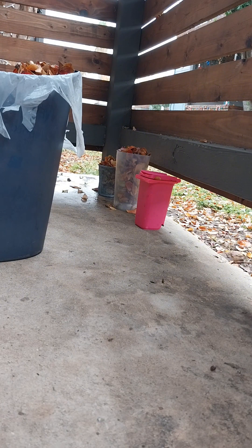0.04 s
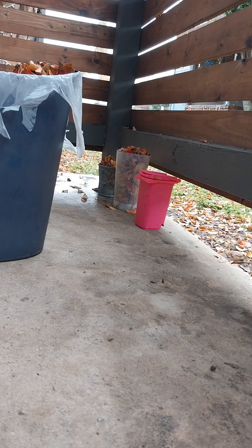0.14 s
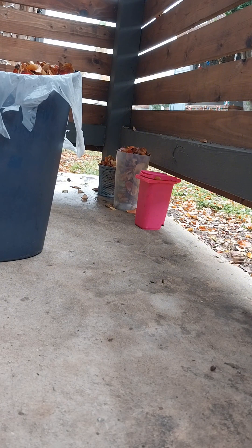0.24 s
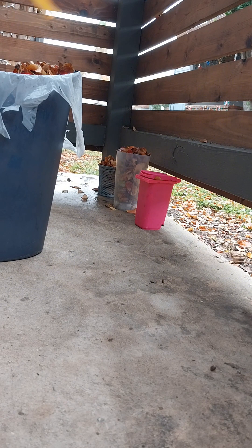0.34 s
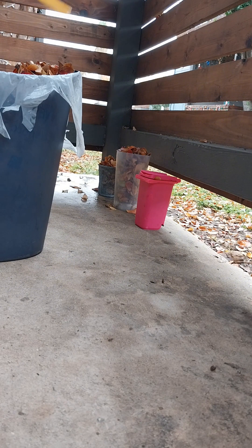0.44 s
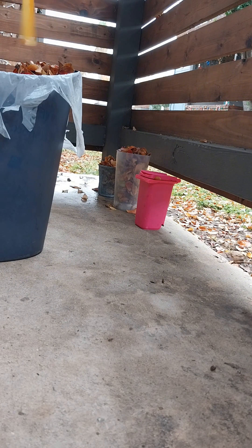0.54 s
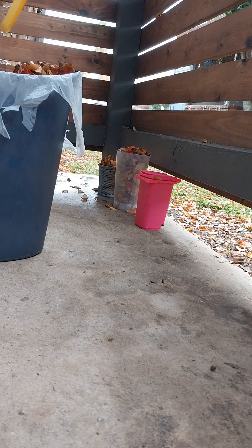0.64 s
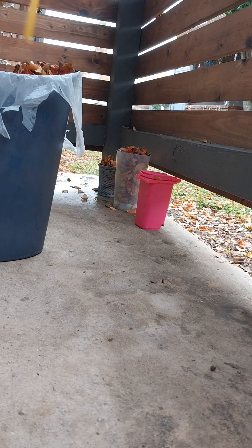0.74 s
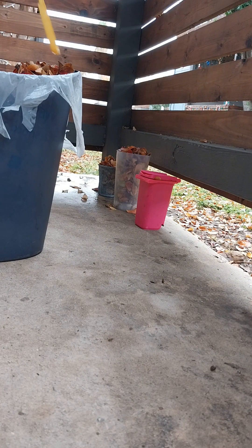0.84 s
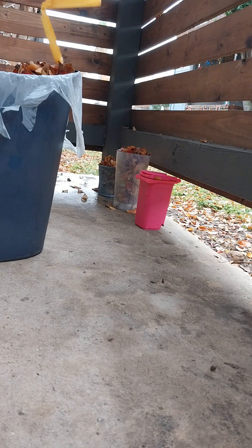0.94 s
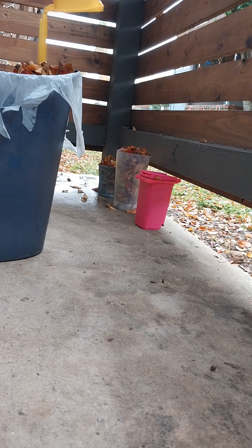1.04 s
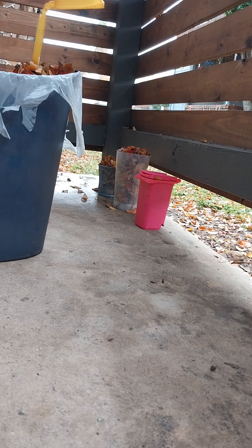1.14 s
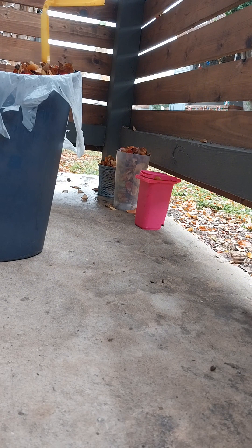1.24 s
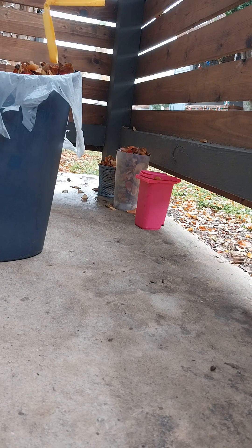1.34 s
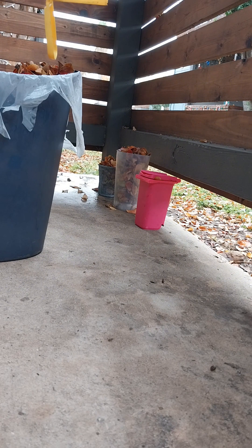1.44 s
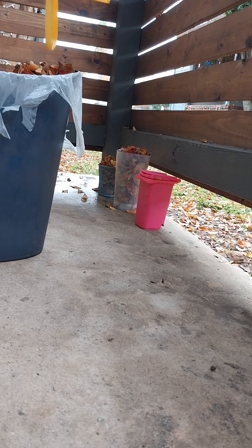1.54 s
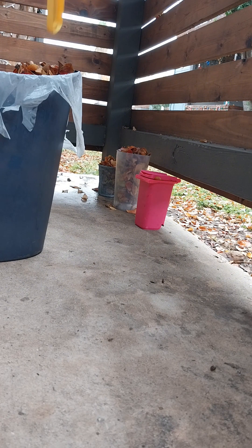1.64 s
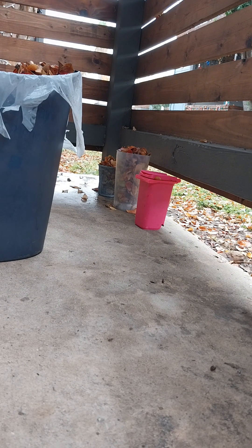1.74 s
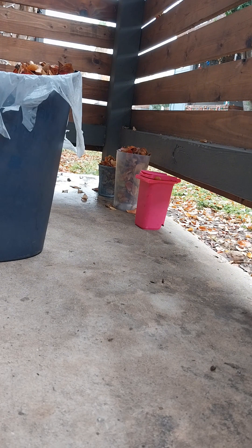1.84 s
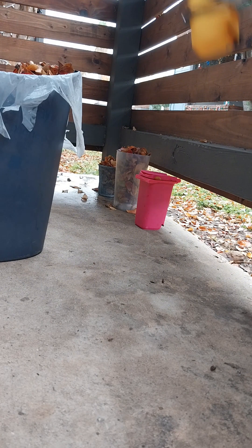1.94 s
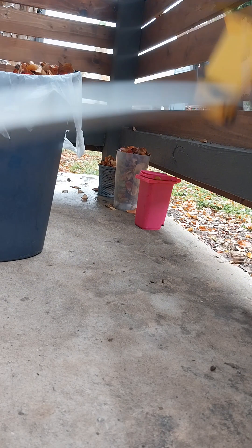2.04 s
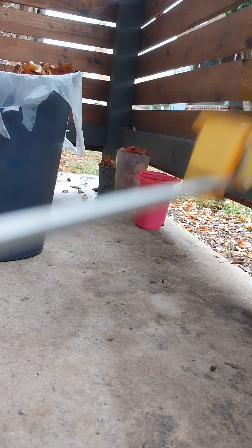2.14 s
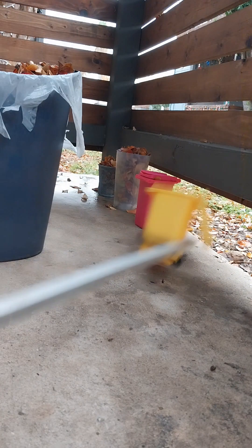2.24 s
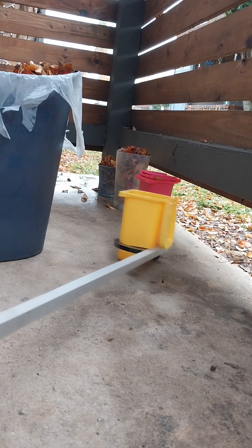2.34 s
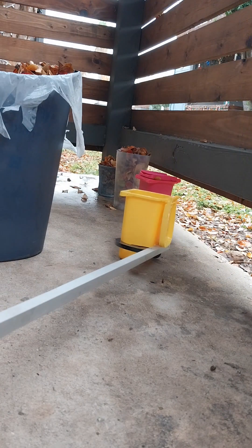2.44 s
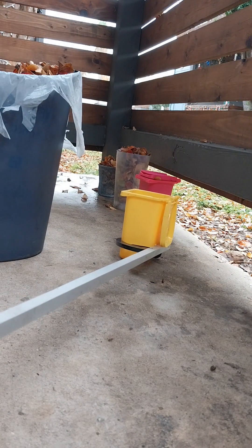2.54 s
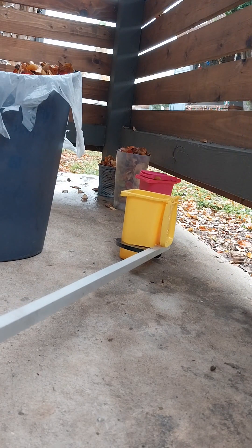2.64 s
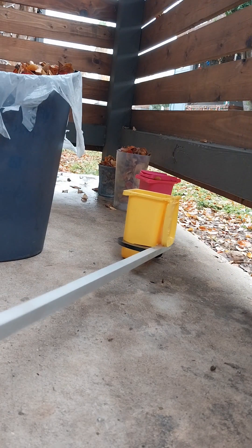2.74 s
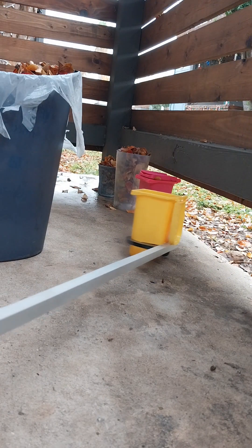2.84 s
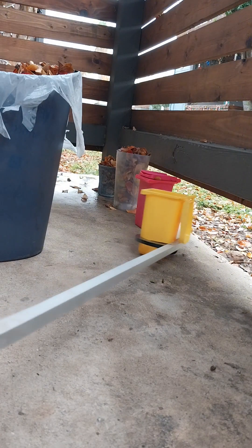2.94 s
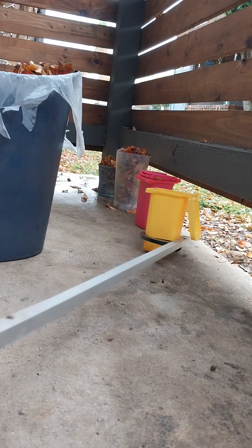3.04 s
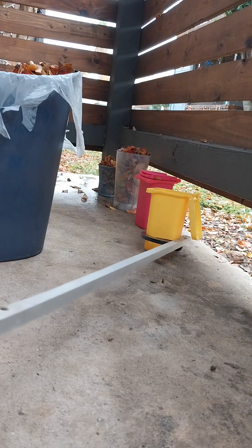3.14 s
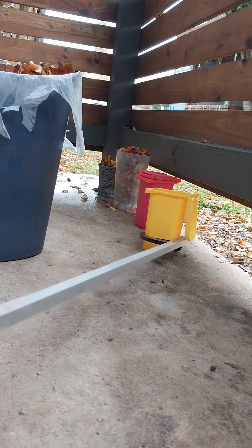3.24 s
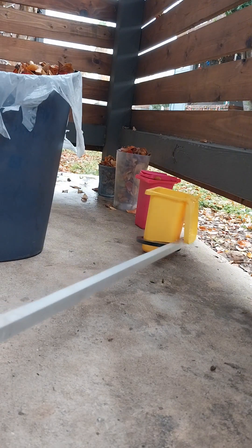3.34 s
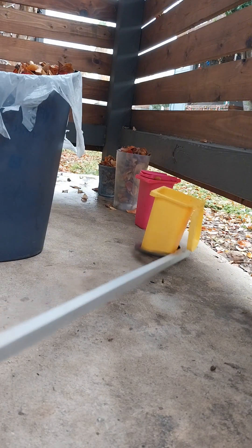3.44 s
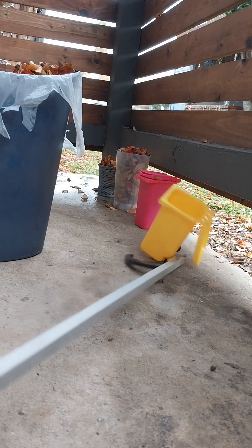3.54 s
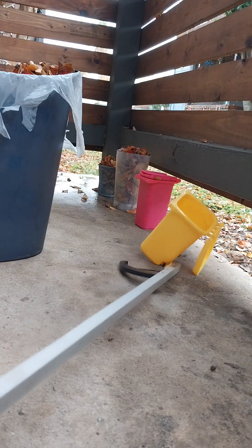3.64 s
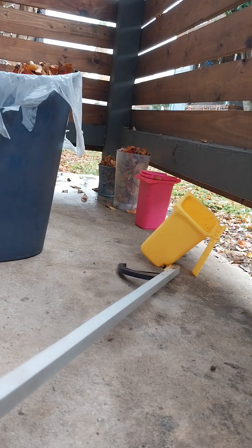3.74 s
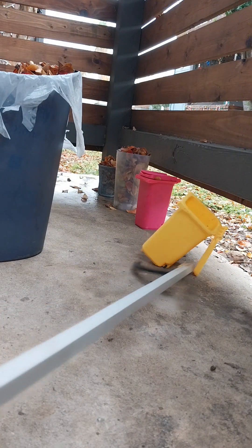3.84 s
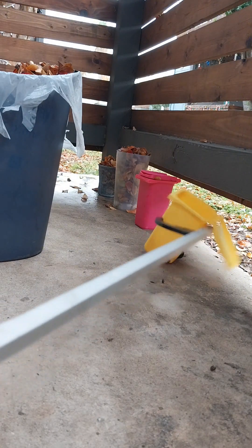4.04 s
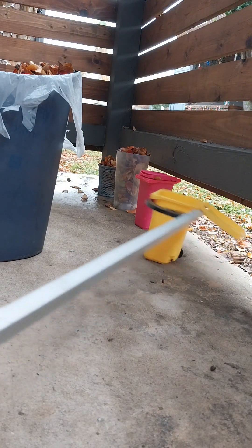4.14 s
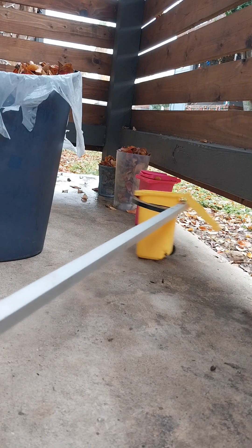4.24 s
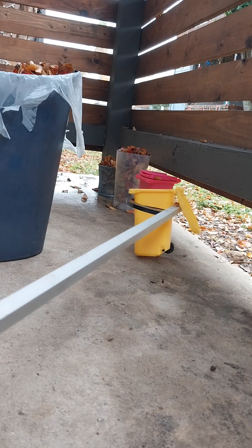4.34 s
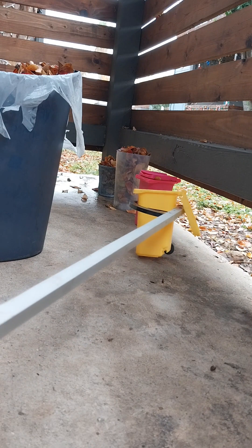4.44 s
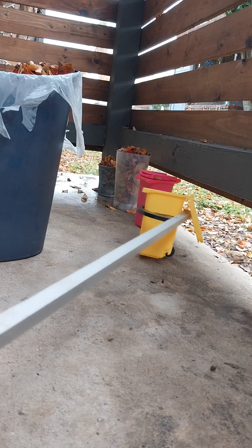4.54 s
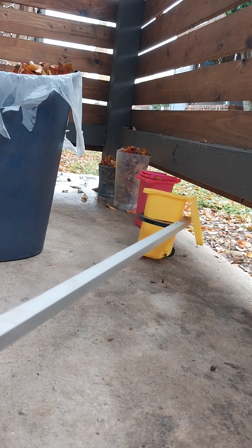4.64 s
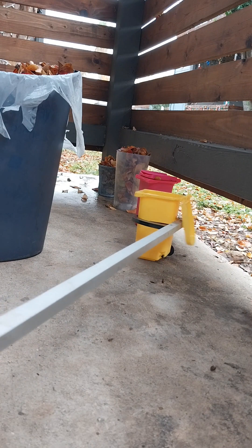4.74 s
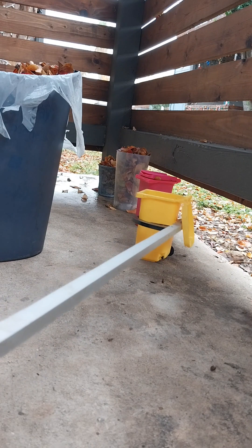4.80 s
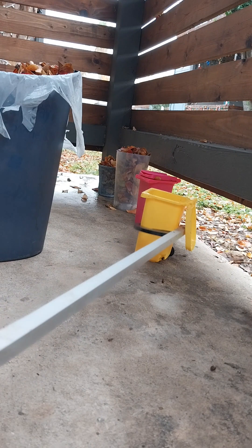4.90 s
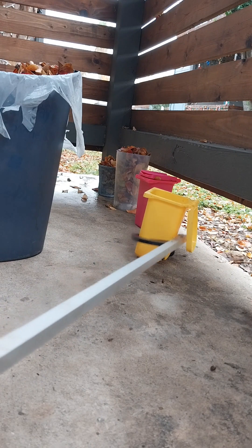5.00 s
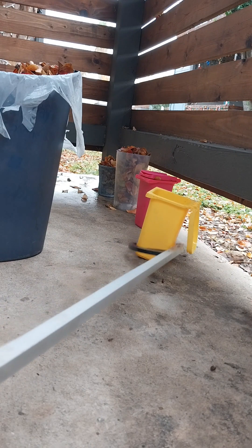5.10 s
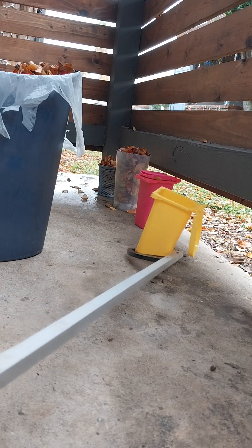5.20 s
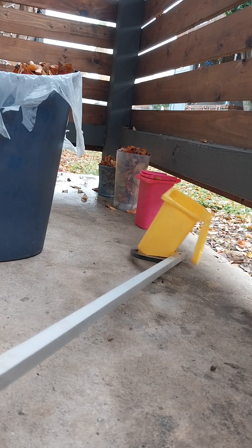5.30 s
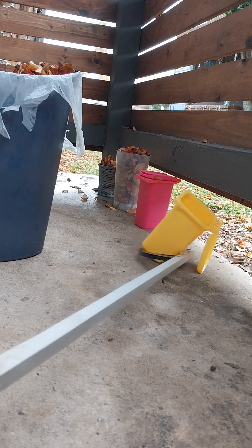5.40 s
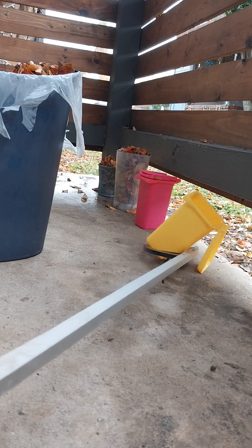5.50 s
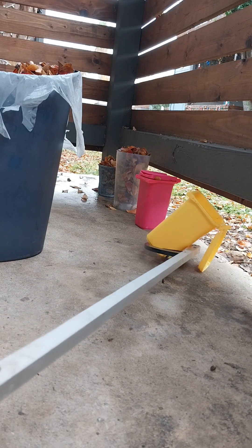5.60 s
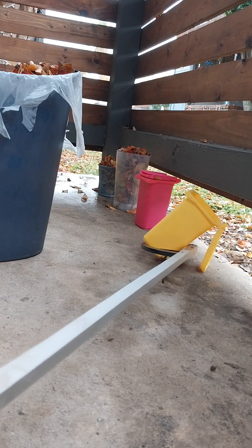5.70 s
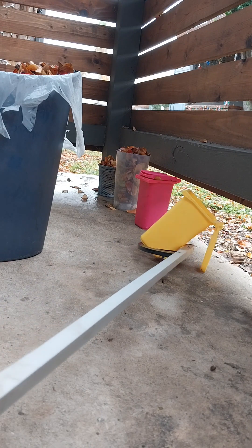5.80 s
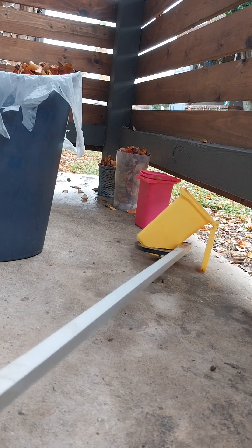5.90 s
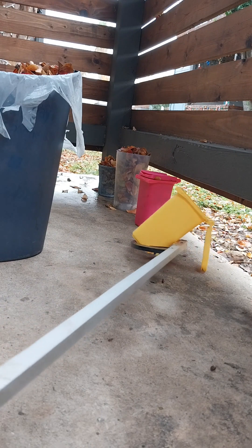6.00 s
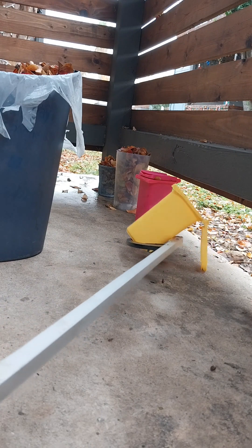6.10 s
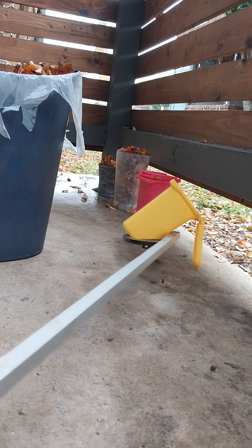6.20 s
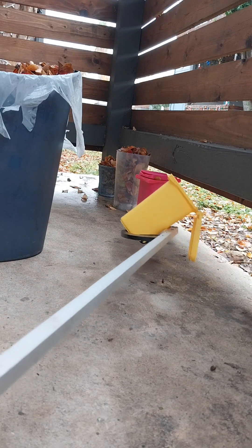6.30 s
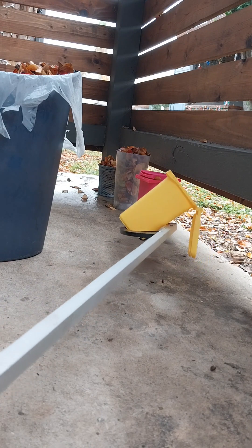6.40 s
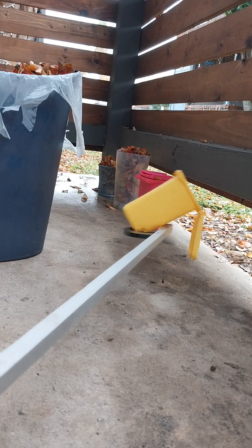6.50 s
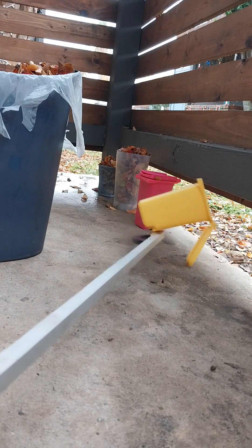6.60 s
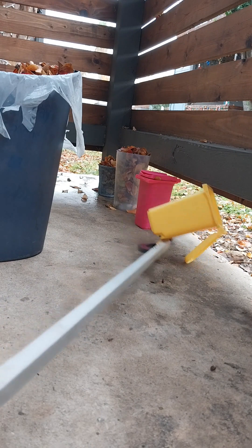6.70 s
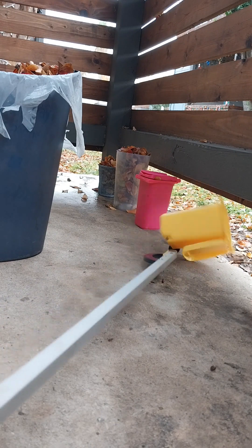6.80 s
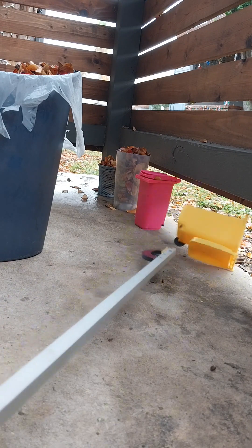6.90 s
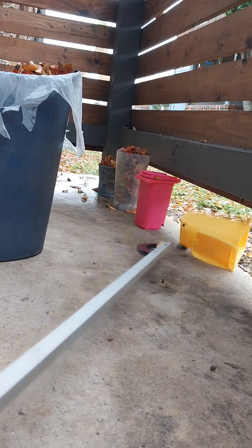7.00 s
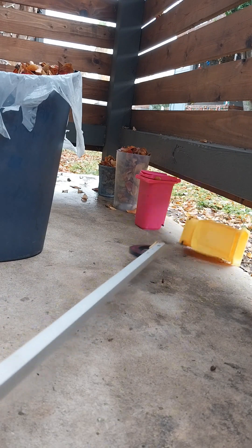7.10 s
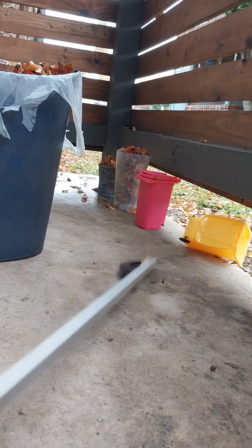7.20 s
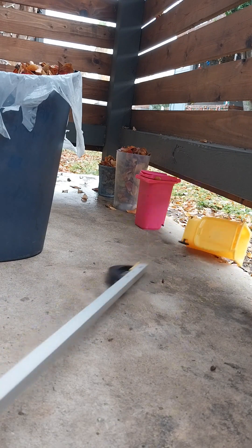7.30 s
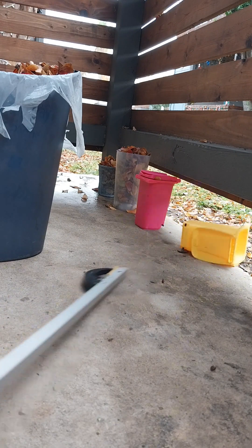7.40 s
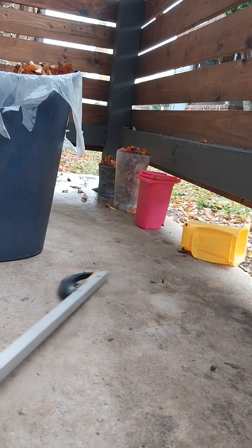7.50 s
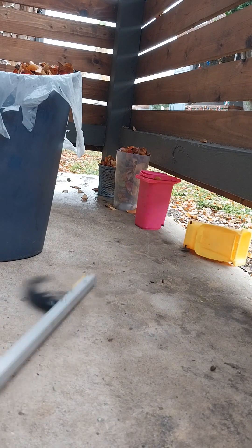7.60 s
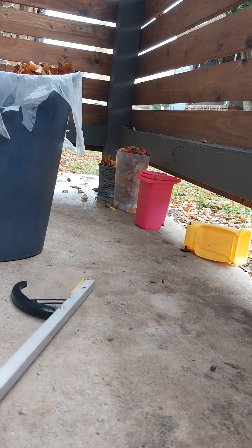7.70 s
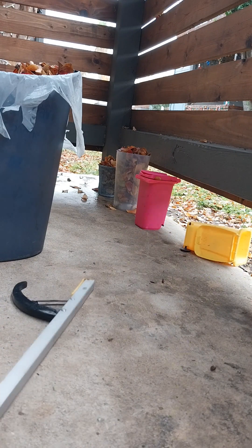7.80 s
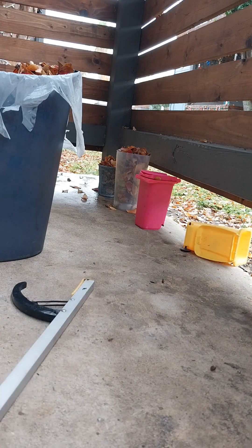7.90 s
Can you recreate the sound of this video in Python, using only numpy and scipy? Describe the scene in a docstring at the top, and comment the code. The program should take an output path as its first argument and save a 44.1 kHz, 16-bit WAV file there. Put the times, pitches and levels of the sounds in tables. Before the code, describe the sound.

A small hollow plastic bin is knocked, shoved and tumbled on concrete by a toy truck arm, metal rod scraping and clanking over distant machinery hum.

```python
"""Machinery hums and rumbles in the distance as wavering low tones and noise; a far bird gives gliding chirps.
A toy garbage-truck arm rustles, then sets a small hollow plastic bin on a concrete porch, shoves it,
tips it and lets it tumble: each knock is a crack, ringing walls and a booming cavity.
The claw rubs the bin, and the arm's metal rod scrapes and clatters, at last by itself:
friction is coloured random slips, clanks are struck modes. Plank walls answer with a short noise tail."""
import sys
import numpy as np
from scipy import signal
from scipy.fft import rfft, irfft, next_fast_len
from scipy.io import wavfile
from scipy.ndimage import map_coordinates

SR = 44100
rng = np.random.default_rng(int(sys.argv[2]) if len(sys.argv) > 2 else 0)


def dump(signal):
    """Clip the signal to [-1, 1] and save it as 16-bit WAV at the path in sys.argv[1]."""
    limited = np.clip(np.atleast_2d(signal).T, -1, 1)
    pcm = np.round(limited * 32767).astype(np.int16)
    wavfile.write(sys.argv[1], SR, pcm)


N = 350595
TIME_S = np.arange(N) / SR
AGE_S = np.arange(SR // 2) / SR  # time since a blow


def amp(db):
    """Decibels to gain."""
    return 10 ** (np.asarray(db) / 20)


def unit(x):
    """Scale to rms 1."""
    return x / np.sqrt(np.mean(x ** 2) + 1e-20)


def blow(x):
    """Scale a burst to the energy of 10 ms at rms 1."""
    return x / np.sqrt(np.sum(x ** 2) / (SR * .01) + 1e-20)


def along(points, hz):
    """Read (Hz, value) points on a log frequency axis."""
    point_hz, value = np.transpose(points)
    return np.interp(np.log(hz + 1), np.log(point_hz + 1), value)


def wobble(rate):
    """A smooth random curve, rate knots a second."""
    knots = rng.standard_normal(int(N * rate / SR) + 4)
    return map_coordinates(knots, [np.arange(N) * rate / SR])


def colour(x, points):
    """Causal minimum-phase filter with the gain of (Hz, dB) points."""
    n = x.shape[-1]
    m = 2 * next_fast_len(n // 2 + 2048)
    gain = amp(along(points, np.fft.rfftfreq(m, 1 / SR)))
    # folding the cepstrum forward in time makes the filter causal
    cepstrum = irfft(np.log(gain), m)
    cepstrum[1:m // 2] *= 2
    cepstrum[m // 2 + 1:] = 0
    return irfft(rfft(x, m) * np.exp(rfft(cepstrum)), m)[..., :n]


def softened(points, db, softening=0.8):
    """A gentle contact lasts longer, so its snap loses the top octave."""
    slope = softening * min(db + 45.5, 0)
    return [(hz, level + slope * np.log2(max(hz / 7500, 1))) for hz, level in points]


def tilted(rows, slope):
    """Tilt rows that begin with (Hz, dB) by slope dB an octave around 1 kHz."""
    return [(hz, db + slope * np.log2(hz / 1000), *rest) for hz, db, *rest in rows]


def fade(t60):
    """Exponential decay after a blow, 60 dB in t60 seconds."""
    return np.exp(-np.log(1000) * AGE_S / t60)


def burst(points, t60, apart, rise=0.00053):
    """A short coloured crack; apart (0-1) is the share of noise that differs between the channels."""
    common, *own = rng.standard_normal((3, len(AGE_S)))
    share = np.clip(apart, 0, 1)
    noise = np.sqrt(1 - share) * common + np.sqrt(share) * np.array(own)
    envelope = fade(t60) * (1 - np.exp(-AGE_S / rise))
    crack = colour((noise * envelope)[:, AGE_S < .08], points)
    return np.array([blow(np.pad(side, (0, len(AGE_S) - len(side)))) for side in crack])


def ring(modes, detune):
    """Modes struck at a new spot: new strengths and signs, pitches shifted by the share detune."""
    luck = rng.standard_normal((len(modes), 3))
    total = 0
    for (hz, db, t60), (strength, shift, sign) in zip(modes, luck):
        tone = np.sin(2 * np.pi * hz * (1 + detune * shift) * AGE_S)
        total = total + np.sign(sign) * amp(db + 4.4 * strength) * fade(t60) * tone
    return blow(total)


def add(track, s, x):
    """Mix x into the track at time s."""
    i = round(s * SR)
    track[:, i:i + x.shape[-1]] += x[:, :N - i]


def grains(rate, spread_db):
    """Tiny random slips, rate a second on average, of very unequal sizes."""
    hit = rng.random(N) < rate / SR
    size_db = spread_db * np.minimum(rng.exponential(size=N), 3)
    return hit * rng.standard_normal(N) * amp(size_db)


def strokes(rows, depth_db=18.5):
    """Friction gains: each swells by depth_db over its rise, holds, then loses depth_db every fall time."""
    total = 0
    for start, rise, hold, fall, *levels_db in rows:
        building = np.clip(1 - (TIME_S - start) / rise, 0, 1)
        dying = np.maximum(TIME_S - start - rise - hold, 0) / fall
        shape = (TIME_S >= start) * amp(-depth_db * (building + dying))
        total = total + np.outer(amp(levels_db), shape)  # one row for each level column
    return total


# decay of the porch's echo: pitch_hz, t60_s
PORCH_DECAY = [(200, 0.71), (530, 0.34), (1400, 0.31), (3700, 0.27), (10000, 0.26), (16000, 0.17)]


def porch(x, wet_db, right_db):
    """Direct sound plus a noise tail from the planks, wider in the treble; right_db lifts the right channel."""
    hz, t, z = signal.stft(rng.standard_normal((2, len(AGE_S))), SR, nperseg=256)
    z = z * np.exp(-np.log(1000) * t / along(PORCH_DECAY, hz)[:, None])
    z[1] *= along([(200, 0.047), (600, 0.57), (2000, 1)], hz)[:, None]  # width over frequency
    mid, side = signal.istft(z, SR, nperseg=256)[1]
    tail = np.array([mid + side, mid - side])
    tail *= 1 - np.exp(-np.arange(len(mid)) / SR / 0.00071)  # soft onset
    tail = tail / np.linalg.norm(mid)
    wet = signal.fftconvolve(np.atleast_2d(x), tail, axes=1)[:, :x.shape[-1]]
    return (x + amp(wet_db) * wet) * amp([[-right_db / 2], [right_db / 2]])


def wash(points, side_db):
    """Coloured stereo noise of rms 1; side_db sets its width."""
    mid, side = colour(rng.standard_normal((2, N)), points)
    return unit(np.array([mid + amp(side_db) * side, mid - amp(side_db) * side]))


# level of the background hum and rumble over time, before the mix trims: time_s, level_db
LOW_LEVEL = [(0.0, -37.5), (0.11, -36.5), (2.32, -37), (2.77, -42.5), (2.92, -37), (3.23, -40.5),
             (4.29, -35), (4.49, -39), (7.44, -35.5), (7.95, -37.5)]
# wavering low hum tones, relative levels: pitch_hz, level_db
HUM_TONES = [(73, -55), (112.5, -42.5), (162, -45.5), (212, -58.5), (353, -59), (410, -72.5)]
# colour of the machine rumble: pitch_hz, relative_level_db
RUMBLE_COLOUR = [(18, -49), (30, -22.5), (48, -8), (62, -4.5), (80, -1), (105, 4), (135, -5), (180, -1),
                 (230, -3), (300, -14.5), (390, -18), (600, -67.5)]
# colour of the outdoor air: pitch_hz, relative_level_db
AIR_COLOUR = [(240, -32.5), (400, -13), (432, -9), (545, -7), (979, -12), (1160, -21.5), (2400, -26.5),
              (3070, -29), (4580, -27.5), (4950, -29), (8900, -39), (13500, -38.5), (16000, -49)]


def background():
    """Distant machinery: wavering hum tones over a noise rumble, and faint outdoor air."""
    level = amp(np.interp(TIME_S, *np.transpose(LOW_LEVEL)))
    hum = 0
    for hz, db in HUM_TONES:
        gain = amp(db + 3.0 * wobble(3.05)) * np.sqrt(2)
        hum = hum + gain * np.sin(2 * np.pi * hz * TIME_S + 0.45 * wobble(5))
    rumble = amp(-1.25) * level * wash(RUMBLE_COLOUR, side_db=-19)
    low = rumble + amp(-5) * unit(level) * hum
    air = amp(-54.5 + 0.43 * wobble(2.14)) * wash(AIR_COLOUR, side_db=-1.5)
    return low * amp([[-.55], [.55]]) + air  # the lows lean slightly to the right


# bird chirps, levels before the mix trim: start_s, length_s, start_pitch_hz, end_pitch_hz, level_db
BIRD_CHIRPS = [(0.065, 0.054, 4590, 3820, -56), (0.108, 0.067, 2930, 2360, -59),
               (0.96, 0.079, 4270, 3440, -56), (1.025, .07, 2700, 2250, -65),
               (5.593, 0.064, 4220, 3900, -58), (5.635, 0.053, 2730, 2490, -58),
               (6.205, 0.075, 3360, 3420, -49), (6.475, 0.029, 3500, 3600, -45)]


def bird():
    """Far, wavering chirps: sines gliding between two pitches, mostly echo."""
    out = np.zeros((2, N))
    for s, length, start_hz, end_hz, db in BIRD_CHIRPS:
        progress = np.minimum(AGE_S / length, 1)
        glide_hz = start_hz + (end_hz - start_hz) * progress
        hz = glide_hz * (1 + 0.053 * wobble(487)[:len(AGE_S)])
        chirp = np.sin(np.pi * progress) * np.sin(2 * np.pi * np.cumsum(hz) / SR)
        add(out, s, porch(amp(db - 7.5) * chirp, wet_db=4.0, right_db=2))
    return out


# the arm handled in the air, levels before the mix trim: start_s, rise_s, hold_s, fall_s, level_db
ARM_HANDLING = [(.27, 0.18, 0.016, .12, -52.5), (.55, .03, 0.067, .12, -65), (.92, 0.097, .03, 0.21, -57.5),
                (1.8, 0.02, .07, .04, -61), (1.98, 0.023, .01, 0.12, -55.5)]
# colour of the rubbing: pitch_hz, relative_level_db
RUSTLE_COLOUR = [(300, -14), (550, 19), (900, 0.5), (1400, 1.5), (3000, -3), (6000, -6.5), (9000, -16),
                 (14000, -9.5)]


def handling():
    """Soft rubbing, made of coloured slips, while the arm is swung into place."""
    rustle, = strokes(ARM_HANDLING)
    slips = grains(rate=2000, spread_db=4)
    return porch(amp(-5) * rustle * unit(colour(slips, RUSTLE_COLOUR)), wet_db=5, right_db=4.0)


# the bin is set down, shoved, tipped, gripped and dropped, levels before the mix trims: start_s, level_db, spot
BIN_KNOCKS = [ (1.075, -43.5, "base"), (1.893, -43.5, "wall"), (2.197, -30.5, "edge"), (2.295, -17, "edge"),
              (2.3003, -12, "wall"), (2.3093, -14, "wall"), (2.3415, -18, "base"), (2.3564, -22, "side"),
              (2.4165, -36.5, "rim"), (2.5461, -46, "rim"), (2.8712, -37, "rim"), (2.9303, -35, "side"),
              (2.9553, -23, "base"), (3.026, -27, "rim"), (3.0534, -25, "base"), (3.344, -35, "edge"),
              (3.4788, -29.5, "wall"), (3.4986, -30.5, "corner"), (3.5234, -25, "base"),
              (3.6283, -18, "wheel"), (3.6354, -20, "side"), (3.7037, -33.5, "rim"), (3.8679, -40, "rim"),
              (3.8902, -26.5, "rim"), (3.907, -28, "rim"), (3.9153, -25.5, "wall"),
              (3.9562, -23.5, "wheel"), (3.9608, -25, "corner"), (3.9937, -24.5, "rim"),
              (4.0715, -28.5, "side"), (4.0834, -28, "side"), (4.116, -20, "base"), (4.1364, -31.5, "base"),
              (4.169, -18.5, "base"), (4.201, -33, "edge"), (4.2124, -13.5, "base"), (4.2144, -24, "wall"),
              (4.2501, -42, "base"), (4.2654, -30.5, "side"), (4.3056, -24, "base"), (4.339, -31, "rim"),
              (4.4144, -31, "side"), (4.639, -39, "wall"), (4.752, -31, "base"), (4.802, -27.5, "wall"),
              (4.872, -35, "wall"), (5.4161, -24.5, "wheel"), (5.595, -39.5, "base"),
              (5.7653, -48.5, "rim"), (6.581, -19.5, "corner"), (6.594, -34.5, "lid"),
              (6.6241, -22.5, "rim"), (6.8297, -17.5, "side"), (6.8977, -19, "rim"), (6.9113, -25.5, "rim"),
              (6.9264, -33.5, "rim"), (6.9938, -36, "wall"), (7.051, -26, "wall"), (7.0839, -28, "rim"),
              (7.1157, -18.5, "corner"), (7.1614, -27.5, "lid"), (7.1921, -31, "lid"), (7.2055, -28, "lid"),
              (7.2174, -26.5, "base"), (7.236, -29.5, "lid"), (7.4084, -28, "rim"), (7.4246, -28, "side")]
# answer of each struck spot, levels relative to the cavity's boom: click_db, wall_db, snap_db, cavity_pitch_hz
STRUCK_SPOTS = {"base": (-16, -7.5, -34, 550.5), "side": (-4, -7, -26.5, 547.5),
                "wall": (-10, -2.5, -25, 546.5), "lid": (-4.5, 3, -24, 591), "rim": (2.5, 2, -13.5, 559),
                "wheel": (0, -2, -8.5, 579.5), "edge": (13.5, -4.5, 0.5, 528), "corner": (3.5, -2, 0, 535)}
# modes of the bin's walls: pitch_hz, relative_level_db, t60_s
WALL_MODES = [(762, 0.5, 0.071), (806, 10, 0.031), (964, 2.5, 0.054), (1220, -10.5, 0.0494),
              (1250, -7.5, 0.051), (1475, 1, 0.017), (1805, -8.5, 0.052), (2017, -6, 0.013)]
# modes of the loose lid, which rings on when it slaps down: pitch_hz, relative_level_db, t60_s
LID_MODES = [(770, 4, 0.17), (846, -11.5, 0.57)]
# colours of the contacts, from dull to bright: pitch_hz, relative_level_db
THUD_COLOUR = [(30, -70), (110, -31), (220, -1), (320, 0), (480, 6), (700, 9), (1100, -37), (3000, -62)]
CLACK_COLOUR = [(100, -50), (400, -11.5), (750, 0), (1050, -4), (1800, -7.5), (2300, -16.5), (3500, -18),
                (9000, -69.5)]
CLICK_COLOUR = [(200, -65), (1200, -22), (2000, -2), (2650, 0.5), (3700, -0.5), (4550, 2.5), (5900, -5),
                (7300, -4.5), (8800, -19), (14000, -59.5)]
SNAP_COLOUR = [(1500, -55), (5000, -15.5), (7500, -3.5), (9000, -7), (11500, 1), (13500, 3), (16000, -7.5)]


def bin_knocks(cavity_t60=0.047, swell=0.0029, contact=.0005, brightening=0.51):
    """Each contact cracks, rattles the thin walls and sets the air in the bin booming."""
    out = np.zeros((2, N))
    for s, cavity_db, spot in BIN_KNOCKS:
        *answer_db, spot_hz = STRUCK_SPOTS[spot]
        click_db, wall_db, snap_db = cavity_db + np.array(answer_db)
        cavity_hz = spot_hz * (1 + 0.026 * rng.standard_normal())  # the boom's pitch varies by blow
        # a flat blow on the base is dull and pumps the air at once;
        # a blow on an edge is bright and the boom builds up
        hardness = np.clip(click_db - cavity_db + 8, -15, 10)
        build_up = swell * 2 ** (hardness / 8)
        slope = brightening * hardness

        boom = np.sin(2 * np.pi * cavity_hz * AGE_S) * fade(cavity_t60)
        cavity = blow(boom * (1 - np.exp(-AGE_S / build_up)))
        thud = amp(-9.5) * burst(THUD_COLOUR, t60=0.025, apart=0.053)
        hollow = amp(cavity_db - 0.5) * (cavity + thud)
        # a hard landing also flexes the base
        thump = amp(click_db - 13) * burst(THUD_COLOUR, t60=0.018, apart=0.26)
        walls = amp(wall_db - 7.5) * ring(tilted(WALL_MODES, slope), detune=0.018)
        if spot == "lid":
            walls = walls + amp(cavity_db - 3.5) * ring(LID_MODES, detune=.004)
        clack = amp(wall_db - 8.5) * burst(tilted(CLACK_COLOUR, slope), t60=0.029, apart=0.17)
        click = amp(click_db - 14.0) * burst(CLICK_COLOUR, t60=0.009, apart=1.0)
        snap = amp(snap_db - 7.0) * burst(softened(SNAP_COLOUR, snap_db), t60=0.02, apart=0.62)

        add(out, s + contact, porch(hollow + thump, wet_db=-8.5, right_db=4))
        add(out, s + contact, porch(walls + clack, wet_db=-7.5, right_db=1.5))
        add(out, s + contact, porch(click + snap, wet_db=-8.0, right_db=0.5))
    return out


# the bin slides, levels before the mix trims: start_s, rise_s, hold_s, fall_s, body_db, grit_db
BIN_SLIDES = [(2.74, 0.15, 0.19, 0.1, -21, -43), (3.2, 0.036, 0.0071, 0.013, -37.5, -81),
              (3.35, 0.009, .17, .03, -29.5, -51), (3.63, 0.031, 0.067, 0.11, -27.5, -51)]
# colours of the drumming body and of the grit under it: pitch_hz, relative_level_db
BODY_COLOUR = [(30, -71), (100, -18), (200, -2), (400, -4), (480, 3), (555, 12), (660, -3), (880, -4.5),
               (1150, -18), (2000, -21), (3500, -22), (9000, -75)]
GRIT_COLOUR = [(880, -26), (1500, -3.5), (2100, -13), (2720, 6.5), (4000, -8.5), (4830, 0), (5830, -11),
               (7690, -18.5), (8570, -21), (12600, -13.5), (16000, -22)]


def bin_slides():
    """The bin judders over the concrete: slips drum its body and grit crackles under it."""
    body, grit = strokes(BIN_SLIDES)
    slips = grains(rate=1200, spread_db=3)
    drum = amp(-8.0) * body * unit(colour(slips, BODY_COLOUR))
    gritty_slips = slips + grains(rate=670, spread_db=3)
    crackle = amp(-1.5) * grit * unit(colour(gritty_slips, GRIT_COLOUR))
    return porch(drum, wet_db=-9, right_db=3.0) + porch(crackle, wet_db=-10, right_db=0.5)


def squeak(centre_hz, wander, width_hz=110):
    """A narrow stick-slip squeak that wanders in pitch and comes and goes."""
    phase = 2 * np.pi * np.cumsum(centre_hz * (1 + wander * wobble(14))) / SR
    narrow = wobble(2 * width_hz) * np.sin(phase) + wobble(2 * width_hz) * np.cos(phase)
    return amp(6.2 * wobble(30)) * narrow


# the rod is dragged, levels before the mix trims: start_s, rise_s, hold_s, fall_s, rasp_db, grit_db
ROD_DRAGS = [(3.415, 0.014, 0.26, 0.044, -35, -48.5), (3.79, 0.04, 0.012, 0.037, -40, -59),
             (7.355, 0.045, 0.23, 0.049, -29, -46), (7.62, 0.032, .012, 0.01, -20, -34.5)]
# the squeal follows the angle of the rod: time_s, centre_pitch_hz
SQUEAL_GLIDE = [(3.45, 2815), (3.52, 3130), (3.85, 3256), (7.369, 3650), (7.48, 3926), (7.6, 3154),
                (7.658, 3710)]
# colour of the rasping tip: pitch_hz, relative_level_db
RASP_COLOUR = [(410, -8.5), (700, 1.5), (831, -11), (1040, 1), (1130, -4.5), (1630, -4.5), (2500, -10.5),
               (2900, -0.5), (4040, -5.5), (5450, -9), (5930, -22.5), (7350, -16), (9000, -34),
               (11700, -41), (19800, -120)]
# modes of the rod: pitch_hz, relative_level_db, t60_s
ROD_MODES = [(2620, -11, .5), (2750, 1, .13), (2838, 0, .11), (3014, -4, .18), (3181, -8, .3),
             (3462, -1, .12), (3619, -1, .12), (3794, 0, .11), (3967, -1, .09), (4106, -2, .09),
             (4395, -4, .12), (4634, -3, .09), (5060, -6, .08), (5670, -7, .15), (6490, -9, .08),
             (11850, -8, .08), (13130, -4, .12)]
SCRAPED_HZ = 6000  # scraping wakes only the modes below this


def rod_drag():
    """The rod's tip stutters along the floor and keeps the rod ringing; its squeaks move with the angle."""
    rasp, grit = strokes(ROD_DRAGS)
    squeal_hz = np.interp(TIME_S, *np.transpose(SQUEAL_GLIDE))
    squeal = unit(sum(squeak(squeal_hz, wander=0.14) for edge in range(3)))
    slips = grains(rate=1100, spread_db=5)
    scraping = amp(-12.5) * unit(colour(slips, RASP_COLOUR)) + amp(-15.5) * squeal
    crackle = amp(-6.5) * grit * unit(colour(slips, SNAP_COLOUR))
    stutter = amp(3.5 * wobble(110))
    modes = ring([mode for mode in ROD_MODES if mode[0] < SCRAPED_HZ], detune=0)
    drive = rasp * stutter * unit(slips)
    ringing = amp(-22.5) * signal.fftconvolve(drive, modes / np.linalg.norm(modes))[:N]
    return porch((rasp * scraping + crackle) * stutter + ringing, wet_db=-1.5, right_db=4.5)


# the rod hits the floor, levels before the mix trims:
# start_s, level_db, chatter_length_s, snap_db (relative to level_db)
ROD_CLANKS = [(3.4326, -37, 0.0033, -8), (3.5128, -21, 0.0039, -14.5), (6.5935, -16, .003, -14.5),
              (7.2627, -21.5, 0.012, -13), (7.3682, -28.5, 0.011, -21), (7.661, -10, .016, -19.5),
              (7.853, -9, 0.0098, -13)]
# the three quick contacts of every landing: share_of_chatter_length, relative_level_db
CHATTER_STEPS = [(0, -4.5), (.36, 3), (0.998, 1)]
# until the claw lets go of the bin, the load silences the rod's modes up to LOADED_HZ
LET_GO_S, LOADED_HZ = 6.8, 3100


def rod_clanks():
    """The rod chatters on the floor and rings: each contact strikes its modes and adds noise cracks."""
    out = np.zeros((2, N))
    contacts = [(s + share * length, db + step_db, snap_db)
                for s, db, length, snap_db in ROD_CLANKS
                for share, step_db in CHATTER_STEPS]
    for s, db, snap_db in contacts:
        modes = [mode for mode in ROD_MODES if s > LET_GO_S or mode[0] > LOADED_HZ]
        metal = amp(db - 16.5) * np.array([ring(modes, detune=0) for ear in range(2)])
        crack = amp(db - 16) * burst(CLICK_COLOUR, t60=0.027, apart=0.9)
        snap = amp(db + snap_db) * burst(SNAP_COLOUR, t60=0.013, apart=1.0)
        knock = amp(db - 24) * burst(CLACK_COLOUR, t60=0.029, apart=0.51)
        add(out, s, porch(metal + crack + snap + knock, wet_db=-8.5, right_db=4.5))
    return out


# the claw rubs on the bin, levels before the mix trim: start_s, rise_s, hold_s, fall_s, level_db
CLAW_RUBS = [(4.594, 0.012, .05, 0.039, -44.5), (4.83, 0.02, 0.069, 0.098, -49.5),
             (6.06, 0.015, 0.22, .03, -63), (6.46, 0.02, 0.085, .01, -50)]
# colour of the scuffing: pitch_hz, relative_level_db
SCUFF_COLOUR = [(100, -38), (400, 1), (800, 6.5), (1150, -5), (1400, -3), (1750, 1), (2300, -14.5),
                (3000, -8.5), (4000, -13.5), (5500, -19), (8000, -29), (14000, -30)]


def claw_rubs():
    """The claw scuffs along the bin's wall in tiny slips that come in clumps."""
    rub, = strokes(CLAW_RUBS)
    slips = grains(rate=900, spread_db=4) * amp(4 * wobble(70))
    return porch(amp(1.5) * rub * unit(colour(slips, SCUFF_COLOUR)), wet_db=1, right_db=2.0)


def scene():
    """Everything on the porch, layered."""
    surroundings = background() + bird()
    plastic_bin = bin_knocks() + bin_slides()
    arm = handling() + rod_drag() + rod_clanks() + claw_rubs()
    return surroundings + plastic_bin + arm


def record(dry, ceiling=.85, top_hz=16000):
    """Round off the highest peaks smoothly below the ceiling, then cut everything above top_hz."""
    rounded = dry / (1 + (dry / ceiling) ** 4) ** .25
    m = next_fast_len(N + SR // 2)
    kept = np.fft.rfftfreq(m, 1 / SR) < top_hz
    return irfft(rfft(rounded, m) * kept, m)[:, :N]


dry = scene()
out = record(dry)
dump(out)
```